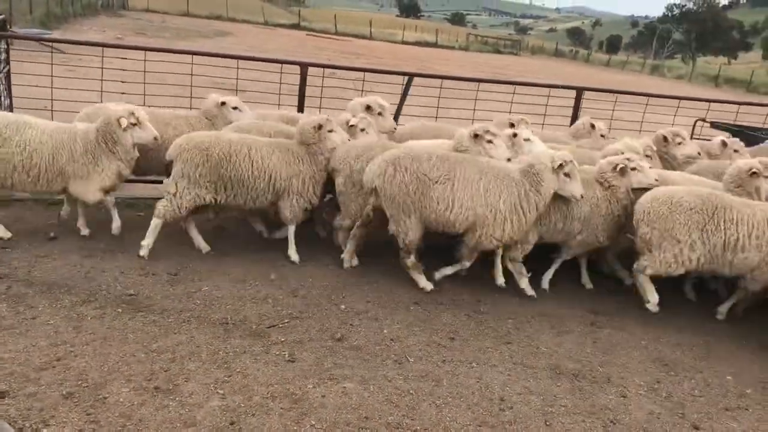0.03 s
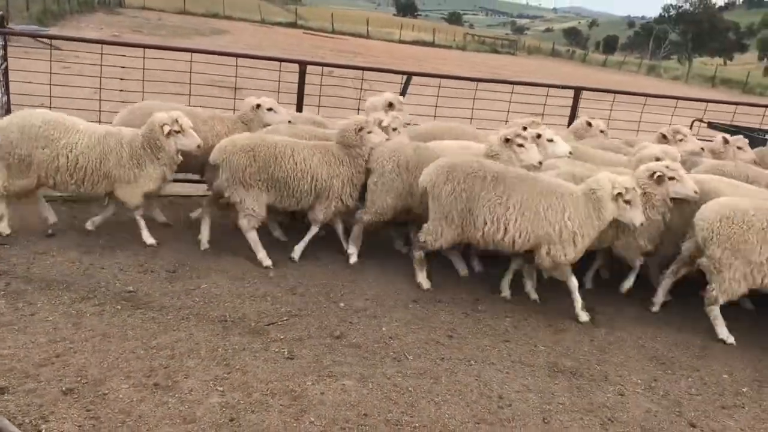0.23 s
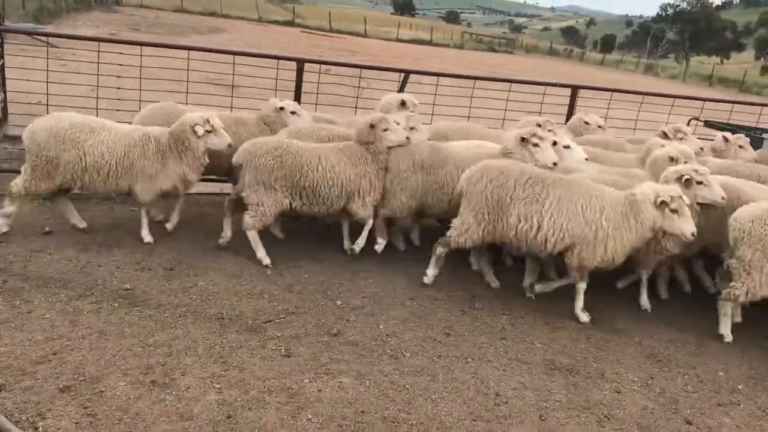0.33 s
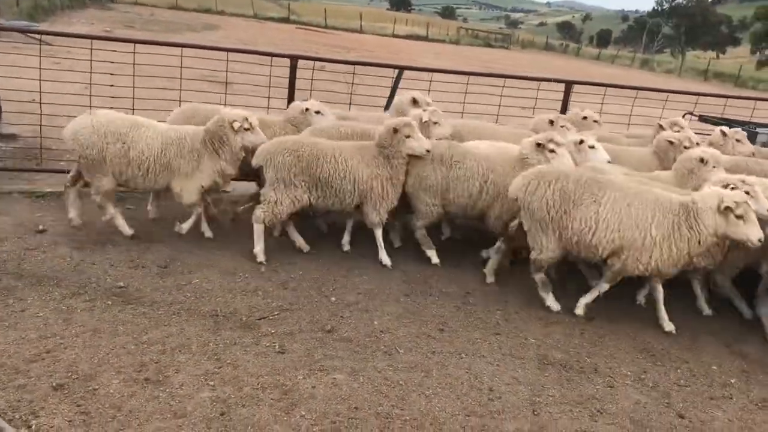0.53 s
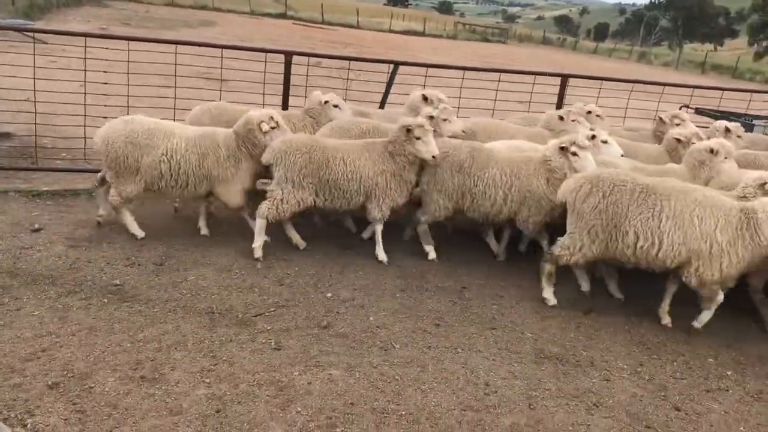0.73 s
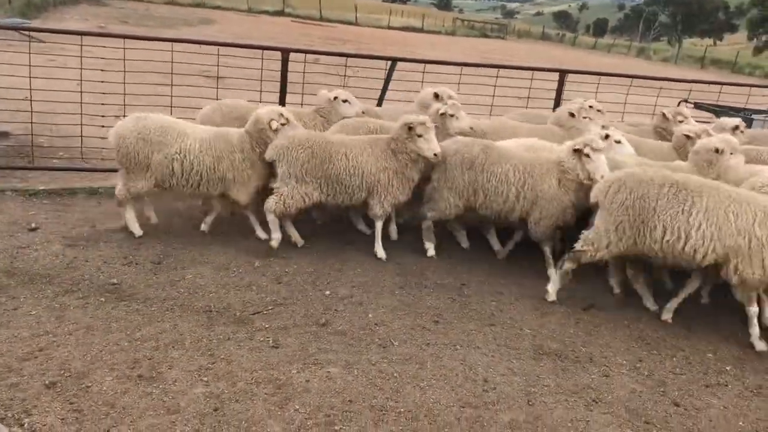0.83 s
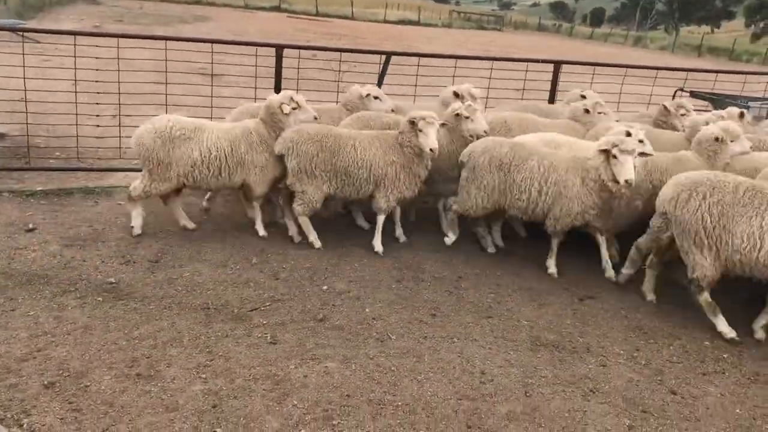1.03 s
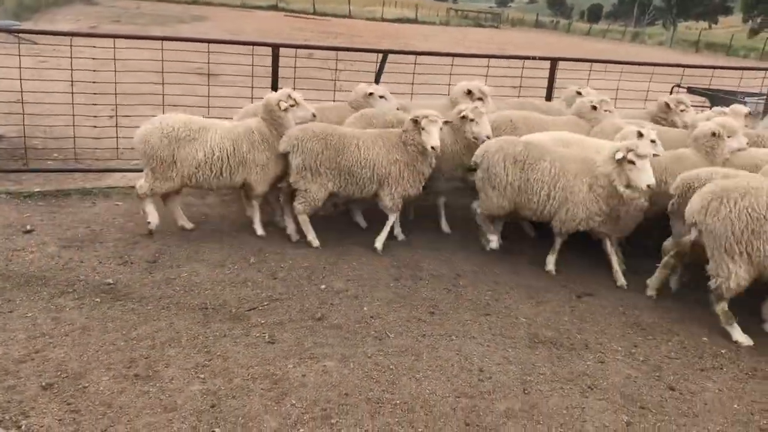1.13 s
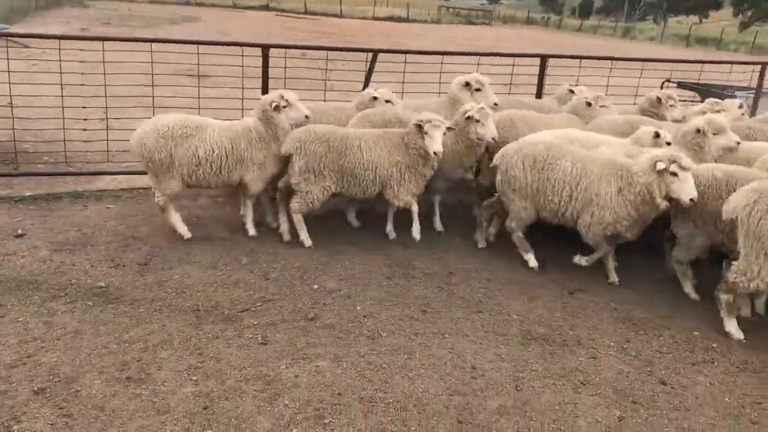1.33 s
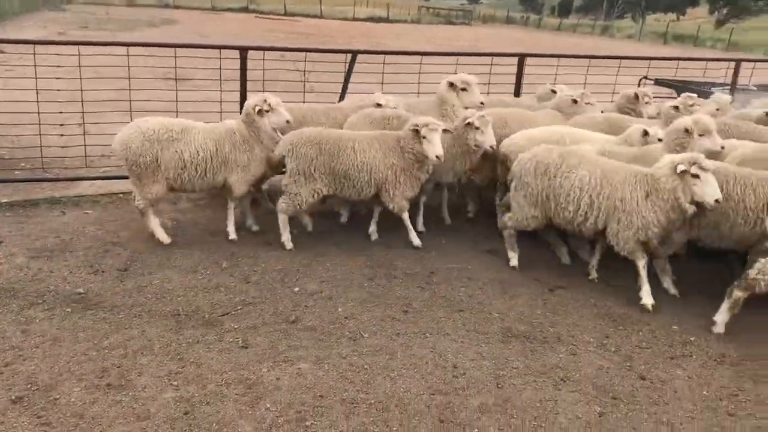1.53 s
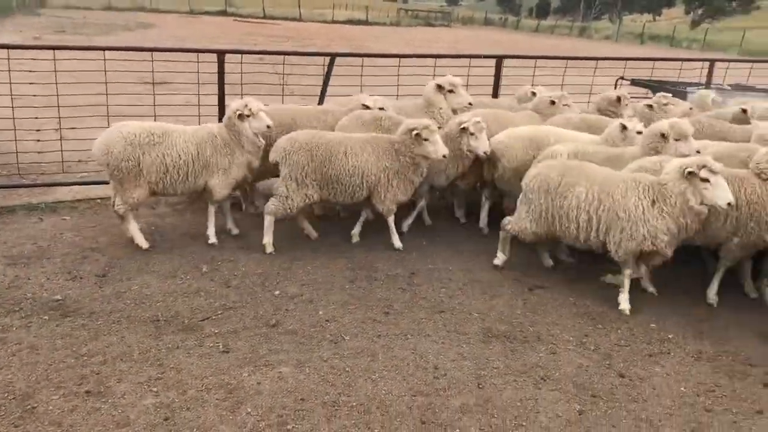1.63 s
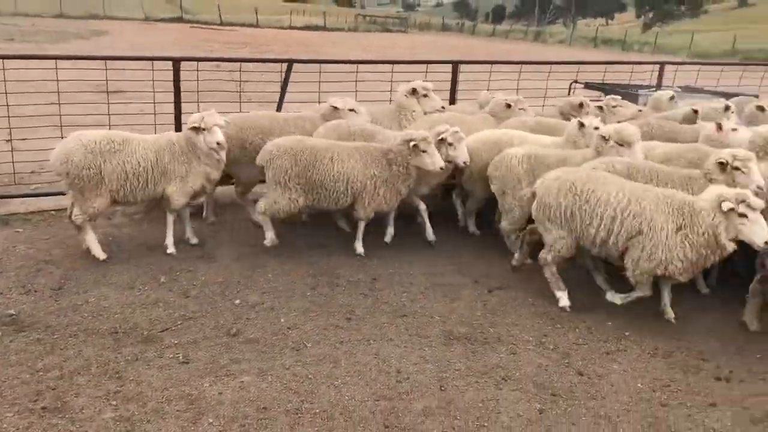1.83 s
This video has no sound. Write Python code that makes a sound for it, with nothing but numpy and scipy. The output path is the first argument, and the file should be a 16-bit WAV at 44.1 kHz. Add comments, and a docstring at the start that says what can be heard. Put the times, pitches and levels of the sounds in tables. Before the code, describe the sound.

A sheep gives one faint, hoarse, quavering bleat some way off in an outdoor yard. Wind rumbles and buffets the microphone as it fades, while the flock's hooves softly scuff the dirt and occasionally click on stones.

```python
"""Sheep crossing a windy yard

A flock trots across a dirt yard, hooves scuffing the grit and now and then clicking on a stone.
Some way off one sheep gives a single hoarse, quavering bleat: uneven vocal fold pulses ring its throat.
Wind rumbles and buffets right on the microphone, over a faint outdoor hiss."""
import sys
import numpy as np
from scipy import signal
from scipy.fft import rfft, irfft
from scipy.io import wavfile
from scipy.ndimage import uniform_filter1d

SR = 44100
rng = np.random.default_rng(int(sys.argv[2]) if len(sys.argv) > 2 else 0)


def output_pcm(signal):
    """Save a mono or channel-first signal as 16-bit PCM at the path in sys.argv[1].

    Samples are clipped to [-1, 1] before scaling.
    """
    pcm = np.clip(np.atleast_2d(signal).T, -1, 1) * 32767
    wavfile.write(sys.argv[1], SR, np.round(pcm).astype(np.int16))


N = 83790


def bleat():
    """Uneven vocal fold pulses ring the throat and gate a rasp; the middle resonances quaver most."""
    # pitch of the voice (time [s], frequency [Hz])
    pitch = [(.1, 154.9), (.16, 163.6), (.235, 163.5), (.28, 170.3), (.305, 166.3), (.33, 165.5),
             (.37, 161.6), (.41, 165.2), (.46, 164.1), (.5, 161.8), (.57, 162.1), (.7, 167.1)]
    # vocal effort, heard in the low resonances (time [s], relative level [dB])
    effort = [(.1, -8), (.122, 1), (.168, 11), (.2, 1.5), (.217, 6), (.234, -2), (.252, 4), (.274, -9.5),
              (.292, 4.5), (.33, 6.5), (.353, 2), (.372, 4.5), (.41, 2.5), (.447, -4), (.465, 2.5),
              (.487, -13), (.523, 4), (.62, -10), (.69, -10), (.735, -29)]
    # brightness of the voice (time [s], middle resonances [dB], top resonances and rasp [dB])
    brightness = [(.0, -78, -86), (.09, -65, -61.5), (.17, -53.5, -57), (.33, -60, -56), (.43, -56.5, -58),
                  (.55, -52, -59.5), (.65, -60.5, -63.5), (.72, -74, -75), (.82, -80, -78)]
    # low, middle and top throat resonances (frequency [Hz], width [Hz], relative level [dB])
    low_modes = [(457, 76, -15.5), (685, 28.4, 7), (740, 24, -28)]
    middle_modes = [(1020, 130, -20), (1510, 80, -6)]
    top_modes = [(2370, 130, 0), (2620, 160, -8), (2880, 210, -3)]
    # spectrum of the rasp (frequency [Hz], relative level [dB])
    rasp_spectrum = [(300, 0), (800, 4.5), (1050, 7.5), (1230, 4), (1420, 7.5), (1900, -0.5), (2400, 9),
                     (2900, -17), (3200, -1), (3800, -26), (7000, -25)]
    quaver_hz, quaver_db, quaver_depth, crest_s = 15, 3.6, .012, .162
    jitter, jitter_rad, shimmer_db, roughness = .007, .06, 1, .35
    voice_db, ends_s, release_db_per_s = -45, .757, 145
    quaver = np.cos(2 * np.pi * quaver_hz * (times() - crest_s) + .3 * walk(8))
    hz = curve(pitch) * (1 + jitter * walk(43) - quaver_depth * quaver)
    phase = 2 * np.pi * np.cumsum(hz) / SR
    pulses = folds(phase) * undb(shimmer_db * walk(85))
    rough_pulses = folds(phase + jitter_rad * walk(83)) * (1 + roughness * walk(86))
    rasp = colour(noise() * (1 + .5 * np.cos(phase)), rasp_spectrum)
    low = throat(pulses, low_modes) * undb(voice_db + curve(effort))
    middle = throat(rough_pulses, middle_modes) * undb(curve(brightness) + quaver_db * quaver)
    top = (throat(rough_pulses, top_modes) + rasp) * undb(curve(brightness, column=2))
    release = undb(-release_db_per_s * np.maximum(times() - ends_s, 0))
    return (low + middle + top) * release


def folds(phase, harmonics=24):
    """One pulse of the vocal folds for each turn of the phase."""
    return np.cos(np.outer(phase, np.arange(harmonics) + 1)).sum(axis=1)


def throat(x, modes):
    """The throat filters the pulses through steep resonances side by side; the result has rms 1."""
    def response(f):
        return sum(undb(db) / (1 + 2 * ((f / hz - hz / f) * hz / width / 2) ** 2)
                   for hz, width, db in modes)
    return unit(shape(x, response))


def yard(x):
    """Ground, rails and fleeces scatter a short tail on the way to the microphone."""
    tail_db, t60_s = -7, .35
    tail = noise() * undb(-60 * times() / t60_s)
    return x + undb(tail_db) * signal.fftconvolve(x, tail / np.linalg.norm(tail))[:N]


def hoof_scuffs():
    """Grit and sand crunch under the flock: dense grains in a flickering bed that swells at each scuff."""
    # steady shuffling of the flock (time [s], grit [dB], sand [dB])
    shuffle = [(0, -56.5, -59.5), (.27, -56, -61), (.55, -56, -63.5), (.65, -63.5, -61), (.7, -62, -64),
               (.77, -62, -66), (1.2, -63, -65.5), (1.4, -63, -70), (1.52, -84, -96), (1.61, -61, -65),
               (1.67, -67, -73), (1.9, -63.5, -85)]
    # single scuffs in the dirt (time [s], length [s], grit [dB], sand [dB])
    scuffs = [(0.046, 0.02, -53.5, -60), (0.154, 0.024, -54, -67), (0.277, 0.0076, -50.5, -55.5),
              (0.644, 0.018, -56, -65), (0.906, 0.0083, -56, -57), (0.994, 0.017, -61, -72),
              (1.326, 0.0025, -57, -55), (1.457, 0.004, -52, -53), (1.547, 0.0044, -56, -58.5),
              (1.729, 0.013, -56.5, -64), (1.817, 0.012, -53, -59), (1.853, 0.0059, -54, -57)]
    # spectra of coarse grit and fine sand (frequency [Hz], relative level [dB])
    grit = [(300, -1.5), (1200, 0.5), (2200, -1), (3800, 0), (5000, -4.5), (6500, -2), (9000, -14.5),
            (15000, -41)]
    sand = [(3000, -7), (6500, -13.5), (9000, -0.5), (10300, -7.5), (12000, -5), (15000, -9.5)]
    grains_per_s, spread_db, flicker_db, flicker_hz = 4500, 3.2, 1.4, 25
    out = np.zeros(N)
    for column, spectrum in enumerate((grit, sand), start=1):
        grains = (rng.random(N) < grains_per_s / SR) * noise()
        grains *= undb(spread_db * np.minimum(rng.exponential(size=N), 4))
        bed = undb(curve(shuffle, column) + flicker_db * walk(flicker_hz))
        scuff_power = sum((undb(db[column - 1]) * swell(at, length)) ** 2 for at, length, *db in scuffs)
        out += colour(unit(grains) * np.sqrt(bed ** 2 + scuff_power), spectrum)
    return out


def hoof_clicks():
    """A struck stone gives a dry click, a pressed pebble a duller one."""
    # hooves meeting stones (time [s], level [dB], decay [s], upper edge [Hz])
    clicks = [(0.034, -43, 0.006, 5630), (0.228, -42, 0.002, 14000), (1.3413, -34.5, 0.0024, 9400),
              (1.3542, -43.5, 0.0011, 9600), (1.748, -44, 0.001, 6400), (1.802, -43, 0.0022, 13000),
              (1.8588, -37, .0012, 4900), (1.865, -50, 0.0011, 4100), (1.87, -47, 0.0078, 4560)]
    # spectrum of a click (frequency [Hz], relative level [dB])
    spectrum = [(400, -6), (1500, -7), (2600, -3), (3500, 3), (4700, -3), (6500, -1.5), (9500, -3),
                (15000, -10)]
    t = times()
    out = np.zeros(N)
    for at, db, decay_s, edge_hz in clicks:
        strike = noise() * undb(db) * (t >= at) * np.exp(-np.abs(t - at) / decay_s)
        out += shape(colour(strike, spectrum), lambda f: 1 / (1 + (f / edge_hz) ** 6))
    return out


def wind():
    """Turbulence right at the microphone: a gusting rumble and a flutter above it."""
    # strength of the gusts (time [s], rumble [relative dB], flutter [relative dB])
    gusts = [(0.0, -38.5, -50), (0.046, -45.5, -37), (0.078, -30.5, -38), (0.164, -27.5, -32.5),
             (0.184, -41, -47), (0.206, -33, -39), (0.29, -26, -30), (0.322, -36.5, -39),
             (0.476, -32.5, -46), (0.534, -32.5, -35.5), (0.566, -25, -16.5), (0.586, -14.5, -16),
             (0.624, -34, -28), (0.66, -32.5, -31.5), (0.698, -24.5, -32.5), (0.724, -34, -40.5),
             (0.76, -40, -22.5), (0.782, -43, -31), (0.83, -32.5, -27), (0.91, -44.5, -46.5),
             (0.952, -26.5, -27.5), (1.016, -33, -47), (1.216, -42.5, -40), (1.238, -32, -55),
             (1.3, -29.5, -36), (1.364, -40.5, -44.5), (1.418, -30, -39), (1.46, -51.5, -58),
             (1.502, -46, -56.5), (1.554, -36.5, -46.5), (1.634, -51.5, -56), (1.66, -39, -32),
             (1.692, -44, -52.5), (1.794, -53.5, -52.5), (1.824, -39, -39.5), (1.9, -51.5, -51.5)]
    # spectra of the two bands (frequency [Hz], relative level [dB])
    rumble_spectrum = [(15, -70), (30, -2), (48, -2), (68, -1.5), (90, -7.5), (130, -22.5), (250, -39),
                       (500, -82)]
    flutter_spectrum = [(55, -63), (85, -14.5), (105, 8), (160, -2), (228, -10.5), (320, -21), (450, -28),
                        (700, -39), (1500, -75)]
    rumble_db, flutter_db = 2, -2.5
    rumble = even(colour(noise(), rumble_spectrum), span_s=.052)
    flutter = even(colour(noise(), flutter_spectrum), span_s=.021)
    return rumble * undb(curve(gusts) + rumble_db) + flutter * undb(curve(gusts, column=2) + flutter_db)


def buffets():
    """Eddies hit the microphone, each one pressure swing with a rough wake."""
    # sharp hits of wind (time [s], wake length [s], relative level [dB], upper edge [Hz])
    hits = [(0.587, 0.0061, -18.5, 475), (0.591, 0.0044, -22.5, 735), (0.628, 0.0077, -27.5, 422),
            (0.702, 0.0032, -25.5, 236.7), (0.755, 0.0028, -18, 210), (0.791, 0.0045, -25.5, 279),
            (0.816, 0.0032, -22, 320), (0.837, 0.013, -30, 275), (0.952, 0.0056, -23.5, 176),
            (1.239, 0.0063, -33.5, 237), (1.66, 0.0038, -43, 184)]
    eddy_to_edge, eddy_cycles, eddy_db = .68, .42, 3
    wake_low_hz, wake_db = 83.6, -3
    out = np.zeros(N)
    for at, length, db, edge_hz in hits:
        hz = eddy_to_edge * edge_hz
        eddy = swell(at, eddy_cycles / hz) * np.sin(2 * np.pi * (hz * (times() - at) + rng.random()))
        push = swell(at, length)
        wake = shape(noise() * push, lambda f: 1 / (1 + (wake_low_hz / f) ** 3) / (1 + (f / edge_hz) ** 5))
        wake = unit(wake) * np.sqrt(np.mean(push ** 2))
        out += undb(db) * (undb(eddy_db) * eddy + undb(wake_db) * wake)
    return out


def air(level_db=-62):
    """The faint, steady hiss of the open yard."""
    # spectrum of the hiss (frequency [Hz], relative level [dB])
    spectrum = [(240, -64), (400, 2), (459, -3), (560, 3.5), (1930, -4), (3570, -4.5), (5000, -7.5),
                (5820, -6), (10400, -14.5), (11800, -9.5), (15500, -12)]
    return undb(level_db) * colour(noise(), spectrum)


def undb(db):
    """Decibels to gain."""
    return 10 ** (np.asarray(db) / 20)


def unit(x):
    """Scale to rms 1."""
    return x / np.sqrt(np.mean(x ** 2) + 1e-20)


def times():
    """Time of every sample."""
    return np.arange(N) / SR


def curve(table, column=1):
    """One column of a table, joined by straight lines in time."""
    rows = np.array(table, float)
    return np.interp(times(), rows[:, 0], rows[:, column])


def noise():
    """White noise."""
    return rng.standard_normal(N)


def shape(x, response):
    """Filter by a response given as a function of frequency."""
    hz = np.maximum(np.fft.rfftfreq(2 * N, 1 / SR), 1)
    return irfft(rfft(x, 2 * N) * response(hz))[..., :N]


def colour(x, points):
    """Filter by (frequency [Hz], level [dB]) points, keeping the power of a white input."""
    hz, db = np.array(points, float).T
    return shape(x, lambda f: unit(undb(np.interp(np.log(f), np.log(hz), db))))


def walk(rate_hz):
    """Smooth random wander with rms 1."""
    return unit(shape(noise(), lambda f: np.exp(-(f / rate_hz) ** 2)))


def even(x, span_s):
    """Flatten the chance swells of a noise, so that a gust curve sets its level."""
    power = np.abs(signal.hilbert(x)) ** 2
    smooth_power = uniform_filter1d(power, max(int(span_s * SR), 1))
    return unit(x / np.sqrt(smooth_power + 1e-12))


def swell(at, length):
    """A bell-shaped envelope."""
    return np.exp(-.5 * ((times() - at) / length) ** 2)


def scene():
    """One microphone in the yard: the bleat some way off, wind on the capsule, hooves and open air."""
    return (yard(bleat()) + wind() + buffets() + hoof_scuffs() + hoof_clicks() + air())[None]


def record(dry):
    """The recorder cuts the lowest rumble and the highest treble."""
    low_cut_hz, top_hz = 30, 15750
    thinned = shape(dry, lambda f: 1 / (1 + (low_cut_hz / f) ** 6))
    return signal.sosfilt(signal.ellip(10, .2, 80, top_hz, fs=SR, output="sos"), thinned)


dry = scene()
out = record(dry)
output_pcm(out)
```